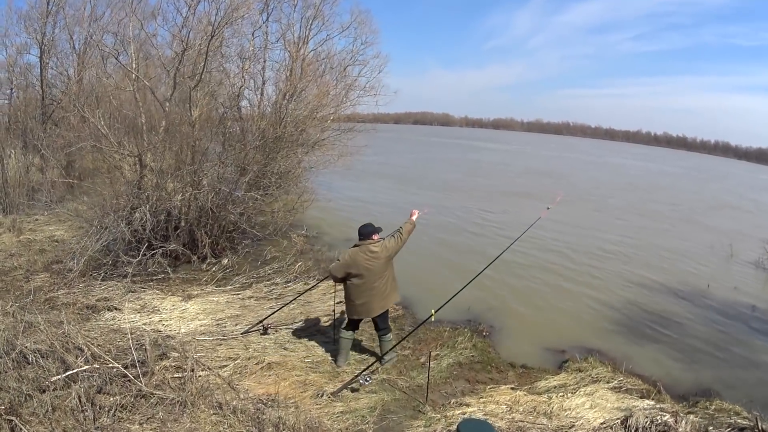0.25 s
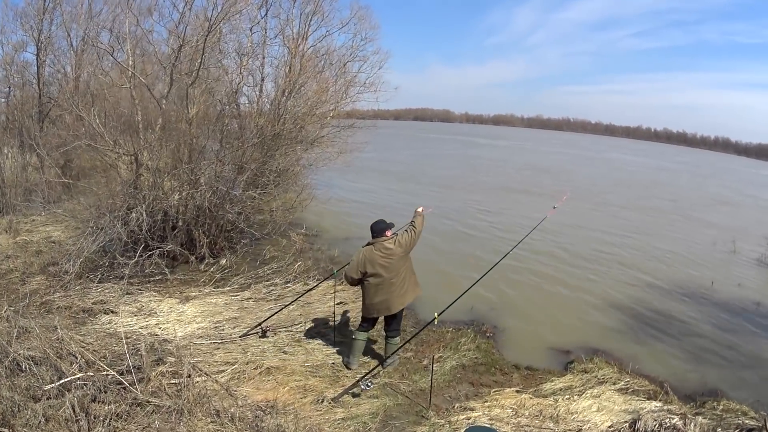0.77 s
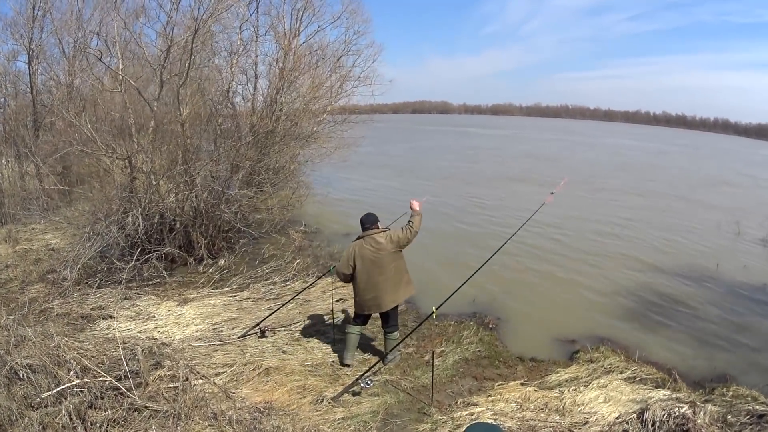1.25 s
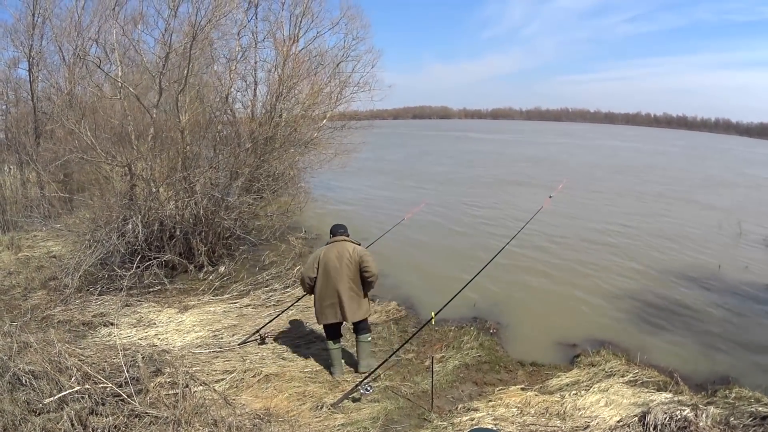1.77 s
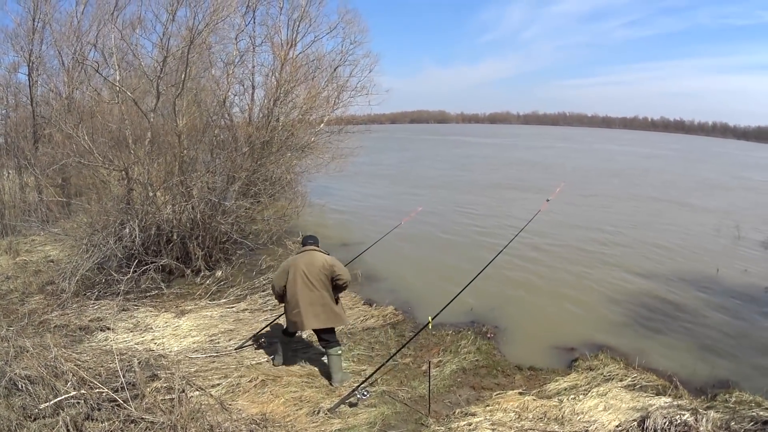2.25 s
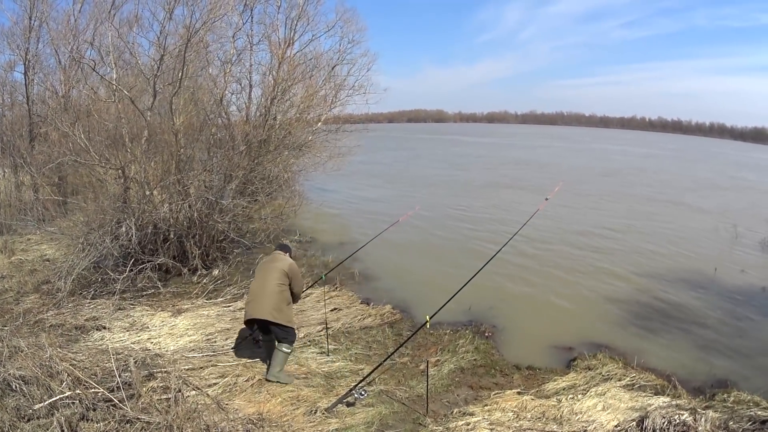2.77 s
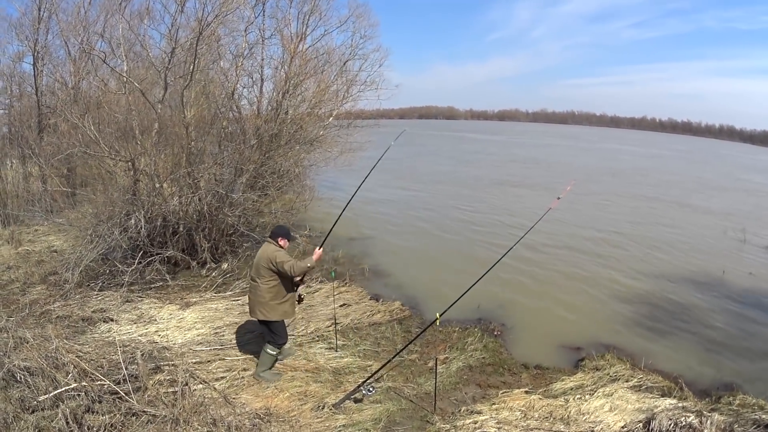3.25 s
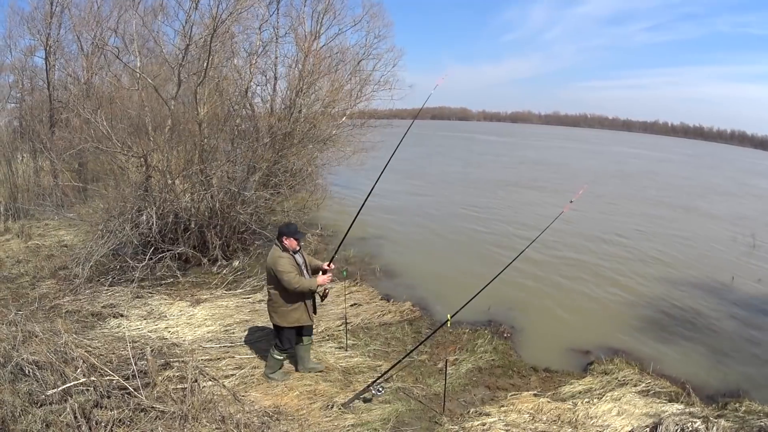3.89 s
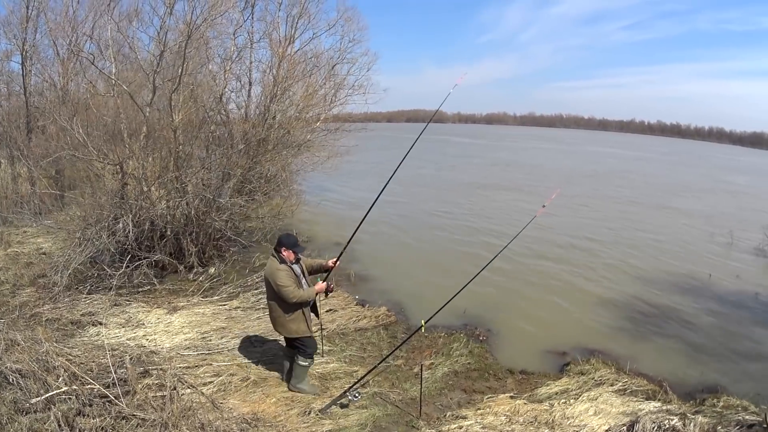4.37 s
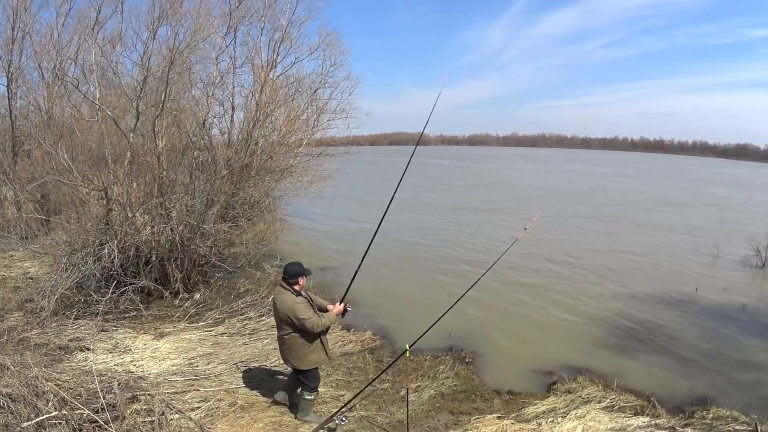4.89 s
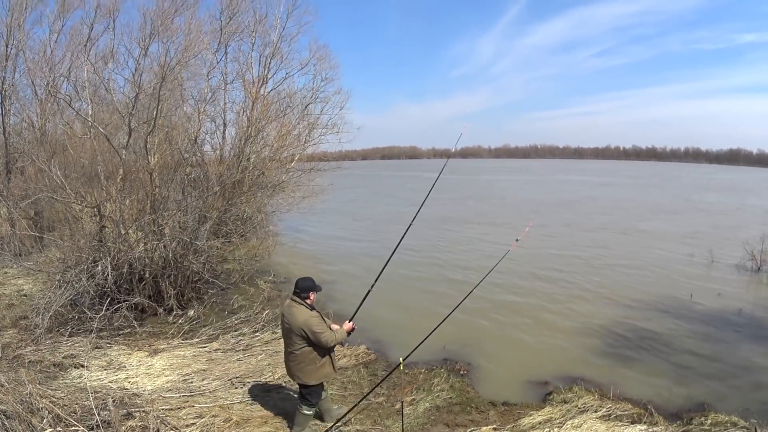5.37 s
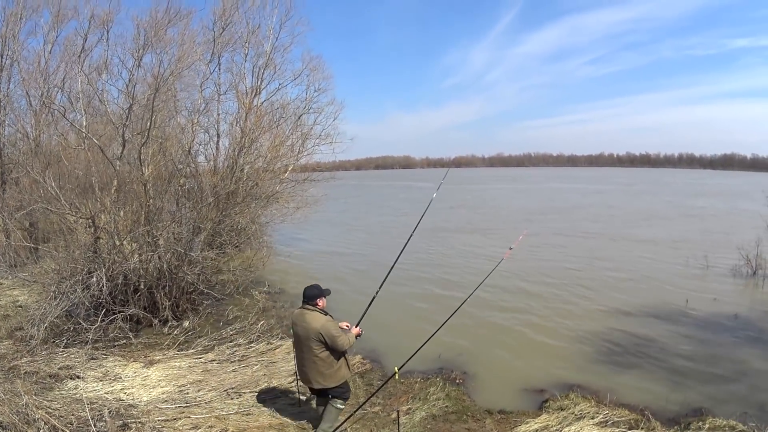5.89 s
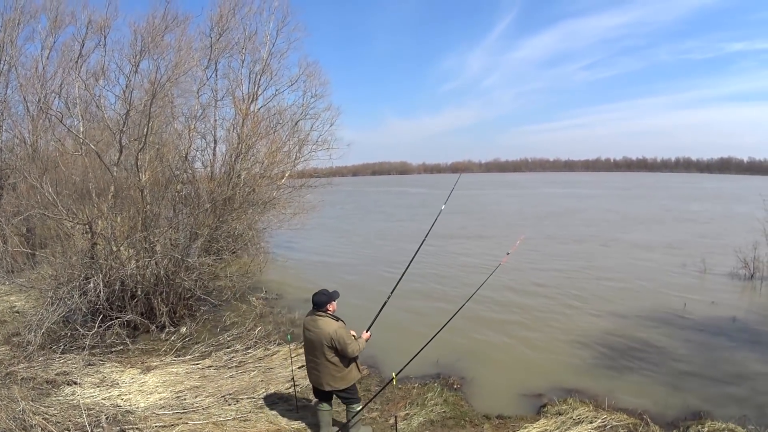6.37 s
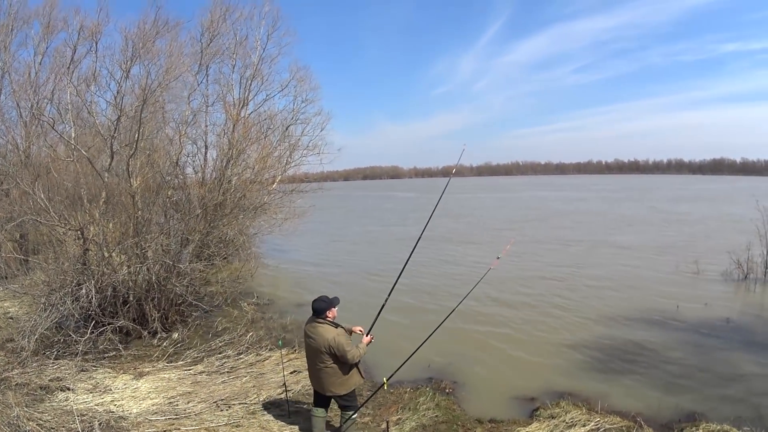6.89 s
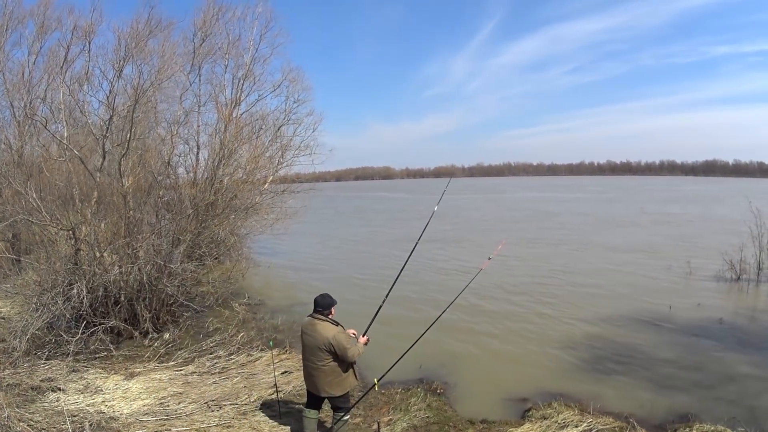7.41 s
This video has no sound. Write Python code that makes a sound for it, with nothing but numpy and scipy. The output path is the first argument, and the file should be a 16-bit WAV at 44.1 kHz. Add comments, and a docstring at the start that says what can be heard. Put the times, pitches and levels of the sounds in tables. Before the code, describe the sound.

Close, dry outdoor stereo sound by water, with very light wind. First a sleeve brushes softly and a tiny rod bell rattles irregularly above gentle grass crunches. Heavier footsteps follow, with straw crackling loudly, boots knocking on earth and twigs cracking. The bell almost stops as the rod is lifted. Finally reel gears whine up and down with each turn of the handle, with a scratchy rub of spool and line, in two spells.

```python
"""On a riverbank an angler treads through dry grass: stalks crunch, twigs snap, boots thud on the earth.
A small bite bell jingles on the rod as he picks it up; then he winds the reel, whose gears whirr in surges.
A hand and a sleeve brush softly close by, and light wind lies underneath.
Grass, earth and rubbing parts are coloured noise or tiny clicks; bell and gears are sums of sine waves."""
import sys
import numpy as np
from scipy import signal
from scipy.fft import rfft, irfft, next_fast_len
from scipy.io import wavfile
from scipy.ndimage import map_coordinates

SR = 44100
rng = np.random.default_rng(int(sys.argv[2]) if len(sys.argv) > 2 else 0)


def inscribe(sig):
    """Save sig as 16-bit PCM at rate SR to the path in sys.argv[1].

    A 1-D sig is mono; a 2-D sig holds one channel per row.
    Samples are clipped to [-1, 1] before scaling.
    """
    pcm = np.round(np.clip(np.atleast_2d(sig).T, -1, 1) * 32767)
    wavfile.write(sys.argv[1], SR, pcm.astype(np.int16))


N = 337365  # length in samples

# Levels in the tables are relative: trims, fades and the left-right balance act on them later.


def amp(db):
    """Decibels to gain."""
    return 10 ** (np.asarray(db) / 20)


def unit(x):
    """x at rms 1."""
    return x / np.sqrt(np.mean(x ** 2) + 1e-20)


def along(points, hz):
    """(Hz, value) points read on a log frequency axis."""
    f, v = np.transpose(points)
    return np.interp(np.log(hz + 1), np.log(f + 1), v)


def curves(rows):
    """One value per sample for each column after the time."""
    s, *cols = np.transpose(rows)
    return [np.interp(np.arange(N) / SR, s, c) for c in cols]


def wobble(rate):
    """A smooth random curve with the given number of knots a second."""
    knots = rng.standard_normal(int(N * rate / SR) + 4)
    return map_coordinates(knots, [np.arange(N) * rate / SR])


def filtered(x, response):
    """x times a complex response of frequency."""
    m = next_fast_len(x.shape[-1] + SR // 4)
    return irfft(rfft(x, m) * response(np.fft.rfftfreq(m, 1 / SR)), m)[..., :x.shape[-1]]


def coloured(x, spectrum):
    """x shaped by a (Hz, dB) spectrum, at rms 1."""
    return unit(filtered(x, lambda hz: amp(along(spectrum, hz))))


def ringing(peaks):
    """The frequency response of (Hz, width Hz, dB) resonances."""
    return lambda f: sum(amp(db) * 1j * f * w / (c * c - f * f + 1j * f * w) for c, w, db in peaks)


def resonant(x, peaks):
    """x through resonances, at rms 1."""
    return unit(filtered(x, ringing(peaks)))


def grains(rate, spread_db):
    """Two unrelated trains of tiny clicks of uneven size, at a rate per second."""
    hit = rng.random((2, N)) < rate / SR
    size = amp(spread_db * np.minimum(rng.exponential(size=(2, N)), 4))
    return unit(hit * size * rng.choice([-1, 1], (2, N)))


def spread(pair, alike):
    """Two unrelated signals, used as middle and side, become left and right of a given likeness."""
    turn = lambda hz: np.arccos(np.clip(along(alike, hz), -1, 1)) / 2
    mid, side = filtered(pair, lambda hz: np.array([np.cos(turn(hz)), np.sin(turn(hz))]))
    return np.array([mid + side, mid - side])


def add(track, s, db, sound):
    """Put a sound into a track at a time and a peak level."""
    part = track[:, max(round(s * SR), 0):][:, :sound.shape[-1]]
    part += amp(db) * (sound / np.abs(sound).max(axis=-1, keepdims=True))[:, :part.shape[-1]]


RISE_DB = 31  # how far a stroke climbs during its rise time


def stroke(s, rise, hold, release):
    """The dB envelope of one stroke: it swells up to s, holds and dies away."""
    t = np.arange(N) / SR - s
    swell = RISE_DB * np.minimum(t, 0) / max(rise, .005)
    fade = release * np.maximum(t - hold, 0)
    return np.maximum(swell - fade, -150)


SETTLE_DB_PER_S = 49


def strokes(rows, release, settle_db=-100):
    """The joint gain of (s, rise, hold, dB) strokes, each with a slower tail at settle_db below it."""
    power = np.zeros(N)
    for s, rise, hold, db in rows:
        tail = settle_db + stroke(s, rise, hold, SETTLE_DB_PER_S)
        level = np.maximum(stroke(s, rise, hold, release), tail)
        power += np.exp((db + level) * np.log(10) / 10)
    return np.sqrt(power)


# boots sweeping through and crushing the stalks:
# (time of full weight [s], rise [s], hold [s], crackle level [dB], crunch level [dB])
GRASS_STEPS = [(0.01, 0.085, 0.016, -47, -50), (0.196, 0.061, 0.032, -47.5, -53.5),
               (0.626, 0.29, 0.013, -48, -49), (0.773, 0.032, 0.05, -49, -50.5),
               (1.354, 0.033, 0.0075, -59, -43), (1.544, 0.48, 0.018, -51, -53),
               (1.637, 0.11, 0.013, -54, -46.5), (1.806, 0.21, 0.032, -51, -51),
               (1.955, 0.027, 0.057, -48.5, -43.5), (2.127, 0.078, 0.25, -32, -48),
               (2.609, 0.29, 0.31, -41, -45.5), (2.996, 0.37, 0.11, -45, -79),
               (3.243, 0.14, 0.018, -42, -48), (3.347, 0.075, 0.031, -45.5, -50.5),
               (3.781, 0.21, 0.021, -33, -45), (4.004, 0.31, 0.041, -42.5, -50),
               (4.297, 0.22, .02, -38, -52), (4.525, 0.19, 0.012, -37.5, -45.5),
               (5.32, 0.23, 0.056, -46.5, -75), (5.94, 0.74, 0.29, -41.5, -50.5)]
# straw stirring underfoot between the steps: (time [s], crackle level [dB])
STRAW_STIR = [(0, -52.5), (1.1, -57.5), (1.9, -56.5), (3.5, -51.5), (4.6, -57), (4.9, -55), (5.7, -65),
              (6.3, -56.5), (6.5, -66)]
# tone of the fine crackle: (frequency [Hz], level [dB])
STALK_TONE = [(1500, -18), (3000, -12), (4500, -6), (6000, -1.5), (7200, -0.5), (8300, 3), (10000, 3),
              (11200, -5.5)]
# tone of the coarser crunch: (frequency [Hz], level [dB])
CRUNCH_TONE = [(300, -3.5), (700, 1.5), (1200, 1.5), (2000, -1.5), (3200, -3), (5000, 3), (8000, -1.5)]
# tone of stiffer stems that crack singly: (frequency [Hz], level [dB])
STIFF_STEM_TONE = [(400, -32), (1000, 3), (2200, 5), (4000, -9), (9000, -5)]
STEMS_PER_S, STEMS_DB = 86, -17.5
STIR_CRUNCH_DB = -5  # crunch of the stirring straw against its crackle
# how fast a step lets go, and the level at which the stalks spring back after it
RELEASE_DB_PER_S, SETTLE_DB = 160, -17


def grass():
    """Many stalks break in clumps under each step: a fine bright crackle over a coarser crunch."""
    stir_db, = curves(STRAW_STIR)
    crackle_rows = [(s, rise, hold, db) for s, rise, hold, db, _ in GRASS_STEPS]
    crunch_rows = [(s, rise, hold, db) for s, rise, hold, _, db in GRASS_STEPS]
    bright = np.hypot(amp(stir_db), strokes(crackle_rows, RELEASE_DB_PER_S, SETTLE_DB))
    coarse = np.hypot(amp(stir_db + STIR_CRUNCH_DB), strokes(crunch_rows, RELEASE_DB_PER_S, SETTLE_DB))
    rate = 5000 * np.sqrt(bright / amp(-48))  # more weight breaks more stalks
    fractures = grains(rate, spread_db=2.0) / np.sqrt(rate)
    clumps = amp(1.4 * wobble(110) + .8 * wobble(25))
    crackle = amp(2.1) * bright * coloured(fractures * clumps, STALK_TONE)
    crunch = amp(2.0) * coarse * coloured(grains(1100, spread_db=1.5) * clumps, CRUNCH_TONE)
    cracks = coloured(grains(STEMS_PER_S, spread_db=4.5), STIFF_STEM_TONE)
    stems = amp(STEMS_DB) * np.sqrt(bright * coarse) * cracks
    return crackle + crunch + stems


# soles scuffing the earth: (time of full weight [s], rise [s], hold [s], level [dB])
SOLE_SCUFFS = [(2.62, 0.065, 0.008, -50.5), (2.76, 0.09, 0.019, -49.5), (4.52, 0.02, 0.012, -52.5)]
# tone of the scuffed earth: (frequency [Hz], level [dB])
EARTH_TONE = [(40, -60), (110, -13), (220, -39), (350, 8), (600, 6), (1050, -7), (1600, -23), (3500, -90)]
# dull knocks of boots on earth and sticks: (time [s], level [dB], pitch [Hz])
BOOT_THUDS = [(0.871, -40.5, 645), (0.988, -39.5, 990), (1.962, -26, 660), (1.963, -44.5, 170),
              (2.003, -34.5, 666), (2.106, -46, 160), (2.173, -31.5, 590), (2.183, -27, 1160),
              (2.432, -32.5, 617), (2.855, -32.5, 2000), (2.954, -35, 520), (3.784, -38.5, 506),
              (3.794, -36, 1900), (4.118, -39.5, 1040), (4.134, -39, 980), (4.162, -43, 1150),
              (4.206, -43, 1470), (4.523, -41.5, 615), (4.536, -43, 210), (5.03, -46, 396),
              (5.205, -39.5, 1180)]


def boots():
    """Soles scuff the ground as gritty noise, and each footfall gives a damped knock."""
    scuff_gain = strokes(SOLE_SCUFFS, RELEASE_DB_PER_S)
    out = scuff_gain * coloured(grains(1800, spread_db=5.5), EARTH_TONE)
    t = np.arange(SR // 6) / SR
    # a short push and a fainter, longer one
    shape = (1 - np.exp(-t / .002)) * (amp(-60 * t / .035) + amp(-20 - 60 * t / .18))
    for s, db, hz in BOOT_THUDS:
        push = rng.standard_normal((2, len(t))) * shape
        knock = resonant(push, [(hz, 0.39 * hz, 0), (200, 120, -15)])
        dulled = filtered(knock, lambda f: 1 / (1 + 1j * f / (3 * hz)))
        add(out, s, db + 0.5, dulled)
    return out


# twigs snapping: (time [s], level [dB], pitch [Hz])
TWIG_SNAPS = [(0.0458, -25.5, 9350), (0.086, -35, 8100), (0.7428, -29.5, 8900), (0.747, -30.5, 8900),
              (0.8763, -36.5, 4530), (1.152, -37, 7040), (2.8545, -22, 8900), (3.467, -29, 8400),
              (3.473, -39, 9500), (4.1344, -28, 9200), (4.1629, -32, 9100), (4.2075, -33, 2410),
              (4.6762, -36.5, 9300), (4.908, -43, 3000), (5.2075, -38, 6150), (5.435, -24.5, 6060),
              (6.8318, -37, 9400)]
TOP_HZ = 11150  # upper limit of the twigs and of the whole scene


def twigs():
    """A twig breaks in one sharp crack; splinters and the ground scatter a faint tail."""
    out, t = np.zeros((2, N)), np.arange(SR // 12) / SR
    for s, db, hz in TWIG_SNAPS:
        crack = rng.standard_normal((2, len(t))) * (amp(-60 * t / .004) + amp(-28 - 60 * t / .05))
        crack[0, 0] = 5  # the break itself, a single click in the middle
        wood = resonant(crack, [(hz, .18 * hz, 0), (5500, 5000, -9)])
        add(out, s + .0005, db + 10.5, filtered(wood, lambda f: f < TOP_HZ))
    return out


# strikes of the bell's pellet: (time [s], level [dB], strongest pitch [Hz], rattling time [s])
BELL_SHAKES = [(0.451, -42, 4360, 0.027), (0.51, -37, 4470, 0.0054), (.533, -31.5, 4360, 0.033),
               (0.559, -33, 4500, 0.0079), (.611, -31, 4100, 0.042), (0.643, -31, 4470, .008),
               (.693, -29, 4700, 0.0074), (0.706, -26.5, 4330, 0.0069), (0.725, -32.5, 4470, .008),
               (0.744, -24, 4100, 0.018), (0.821, -24.5, 4690, .005), (0.832, -32, 4450, 0.023),
               (0.864, -30, 4040, 0.019), (0.953, -37, 4450, .004), (0.987, -33.5, 4320, .004),
               (1.021, -32.5, 4470, .004), (1.089, -36, 4160, 0.0076), (1.139, -39, 4350, 0.0094),
               (1.231, -31.5, 4305, .005), (1.259, -31.5, 4060, 0.019), (1.296, -30.5, 4060, 0.023),
               (1.32, -31, 4130, 0.018), (1.347, -35.5, 4440, .006), (1.433, -27.5, 4830, 0.0055),
               (1.551, -30, 4000, 0.0044), (1.74, -32, 4680, .006), (1.808, -32.5, 4030, .003),
               (1.839, -27, 4290, .005), (1.988, -27.5, 4180, 0.0084), (2.035, -33.5, 4460, 0.022),
               (2.086, -24.5, 4336, 0.004), (2.194, -23, 4000, 0.0085), (2.442, -36.5, 4670, 0.026),
               (2.498, -33, 4630, 0.013), (2.604, -25.5, 4180, 0.0096), (4.107, -43, 4360, 0.0073)]
# the tones of the bell's shell: (frequency [Hz], level [dB], time to fade by 60 dB [s])
BELL_MODES = [(3950, -13.5, 0.072), (4100, -12, 0.097), (4250, 0.5, 0.034), (4490, -5, 0.12),
              (4757, -0.5, 0.015), (4970, -0.5, 0.016), (5280, 0.5, 0.011), (8180, -12, 0.044),
              (9060, -15, 0.052)]
FAVOUR_DB, FAVOUR_HZ = 13, 135  # how strongly and how widely the struck spot favours its modes
CONTACTS_PER_S = 480


def bell():
    """With each shake the pellet hits the shell, then rattles on ever more lightly."""
    out, t = np.zeros((2, N)), np.arange(SR // 5) / SR
    for s, db, pitch_hz, rattle in BELL_SHAKES:
        touching = rng.random(len(t)) < CONTACTS_PER_S / SR
        contacts = touching * rng.standard_normal(len(t)) * np.exp(-(t / rattle) ** 2)
        contacts[0] = 1.1  # the first hit
        # the pellet rolls on and keeps the shell faintly ringing
        contacts += .022 * rng.standard_normal(len(t)) * np.exp(-t / .04)
        swing = t * (1 + .004 * rng.standard_normal())  # each shake is slightly off in pitch
        shell = 0
        for hz, level, t60 in BELL_MODES:
            # the struck spot favours the modes near one pitch and its octave
            distance_hz = min(abs(hz - pitch_hz), abs(hz / 2 - pitch_hz))
            favour_db = FAVOUR_DB * np.exp(-(distance_hz / FAVOUR_HZ) ** 2)
            # each mode radiates its own way: random phases in the two channels
            tone = np.sin(2 * np.pi * (hz * swing + rng.random((2, 1))))
            shell = shell + amp(level + favour_db - 60 * t / t60) * tone
        shell *= 1 - np.exp(-t / .001)
        add(out, s + .001, db, signal.fftconvolve(shell, contacts[None], axes=1)[:, :len(t)])
    return out


# surges of the gears, in two spells of winding: (time of crest [s], tooth rate [Hz], whine level [dB])
GEAR_SURGES = [(4.9, 1000, -78), (5.015, 1320, -59), (5.08, 1550, -61), (5.14, 1310, -56),
               (5.237, 1480, -61), (5.297, 1570, -60), (5.372, 1190, -47), (5.42, 1180, -54),
               (5.555, 2090, -62), (5.608, 2870, -52), (5.666, 3350, -49), (5.729, 2750, -49),
               (5.818, 2600, -49), (5.895, 2800, -54), (5.98, 2700, -46), (6.045, 2650, -43),
               (6.117, 2600, -44), (6.207, 2110, -42), (6.298, 2020, -45), (6.39, 1300, -72),
               (6.7, 800, -80), (6.8, 1025, -65), (6.98, 1435, -56), (7.108, 1525, -58), (7.228, 1990, -53),
               (7.322, 2240, -48), (7.418, 2390, -46), (7.495, 2950, -43), (7.562, 2825, -47),
               (7.645, 2100, -46)]
# multiples of the tooth rate; alternate teeth mesh unevenly, which gives the half order:
# (multiple [x tooth rate], level [dB])
GEAR_MESH = [(1, -2), (1.5, -18.5), (2, -0.5), (3, -12)]
# the lowest partial weakens as the winding goes on: (time [s], level [dB])
LOWEST_PARTIAL = [(5.85, 0), (6.3, -7)]
# how well the housing radiates the whine: (frequency [Hz], level [dB])
HOUSING_TONE = [(900, -22), (1600, 0), (5500, 0), (10000, 8)]
# resonances that flare up as the whine sweeps over them: (frequency [Hz], width [Hz], level [dB])
WHINE_FLARES = [(2330, 140, 8), (4170, 160, -1)]
# the rubbing parts: (time [s], body level [dB], spool level [dB], line roller level [dB])
RUBBING_LEVELS = [(4.92, -61, -85, -80), (4.98, -55, -56.5, -67), (5.22, -58.5, -62.5, -62),
                  (5.38, -56.5, -60, -55), (5.62, -52.5, -55, -46.5), (5.87, -52, -57, -51),
                  (6.2, -51, -48.5, -61), (6.42, -58, -57.5, -71), (6.47, -90, -80, -83),
                  (6.68, -74, -65.5, -72), (6.78, -58, -60, -58.5), (7.2, -53.5, -54.5, -53.5),
                  (7.65, -51, -46, -55)]
# resonances of body, spool and line roller, each: (frequency [Hz], width [Hz], level [dB])
BODY_PEAKS = [(1250, 200, -3), (1650, 180, 1), (2310, 120, 6), (2600, 150, 0), (2960, 200, -4),
              (2040, 900, -3)]
SPOOL_PEAKS = [(4190, 50, 7.5), (4730, 150, -0.5), (5300, 210, 1), (5590, 190, -5), (6200, 210, -6)]
ROLLER_PEAKS = [(7830, 130, 4), (7900, 67, -3.5), (8260, 110, 2.5), (8880, 120, -6.5), (9300, 130, -7)]
# left-right likeness of the angler's sounds: (frequency [Hz], likeness [0 to 1])
ANGLER_ALIKE = [(150, 0.92), (1300, 0.35), (2500, 0.61), (5000, 0.94), (10000, 0.97)]
SAG_SHARE = .35  # share of their speed that the gears lose midway between two surges
WHINE_SAG_DB, RUB_SAG_DB = 5.5, 5  # how far whine and rubbing fade there


def reel():
    """Gears surge and sag, so their whine moves in arches; body, spool and line roller rub along."""
    crest_hz, whine_db = curves(GEAR_SURGES)
    turn, = curves([(row[0], k) for k, row in enumerate(GEAR_SURGES)])
    sag = np.abs(np.sin(np.pi * turn)) ** 3  # 0 at a crest, 1 midway between two
    tooth_hz = crest_hz * (1 - SAG_SHARE * sag) * (1 + .024 * wobble(400))
    phase = 2 * np.pi * np.cumsum(tooth_hz) / SR
    lowest_db, = curves(LOWEST_PARTIAL)
    teeth = 0
    for k, db in GEAR_MESH:
        level_db = db + lowest_db * (k == 1) + 3.5 * wobble(300) + 3 * wobble(70)
        teeth = teeth + amp(level_db) * np.sin(k * phase + .55 * wobble(1100))
    surging = teeth * amp(whine_db - WHINE_SAG_DB * sag)
    whine = filtered(surging, lambda hz: amp(along(HOUSING_TONE, hz)) + ringing(WHINE_FLARES)(hz))

    body_db, spool_db, roller_db = curves(RUBBING_LEVELS)
    drag_db = lambda: 2 * wobble(40) - RUB_SAG_DB * sag
    body = amp(body_db + 1.5 + drag_db()) * resonant(grains(6500, spread_db=3.5), BODY_PEAKS)
    spool = amp(spool_db + 1.5 + drag_db()) * resonant(grains(6000, spread_db=1.5), SPOOL_PEAKS)
    roller = 0
    for hz, width, db in ROLLER_PEAKS:  # each resonance flutters on its own
        rub = resonant(grains(4000, spread_db=-0.5), [(hz, width, 0)])
        roller = roller + amp(roller_db + db - 5 + drag_db()) * rub
    rubbing = spread(body + spool + roller, ANGLER_ALIKE)
    return (turn > 0) * (whine + rubbing)  # silent until the handle turns


# soft hollow rubs of a hand: (time [s], level [dB], pitch [Hz])
HAND_RUBS = [(1.084, -44.5, 870), (1.264, -42.5, 960), (1.384, -41, 950)]


def hand():
    """A shifting grip rubs a hollow housing: soft bursts of noise through two resonances, twice."""
    out, t = np.zeros((2, N)), np.arange(SR // 5) / SR
    for s, db, hz in HAND_RUBS:
        rub = rng.standard_normal((2, len(t))) * (1 - np.exp(-t / 0.0059)) * amp(-60 * t / 0.25)
        housing = [(hz, 220, 0), (220, 260, -2.5)]
        add(out, s, db + 4.0, resonant(resonant(rub, housing), housing))
    return out


# soft brushes of a sleeve: (time of full weight [s], rise [s], hold [s], level [dB])
SLEEVE_BRUSHES = [(0.225, 0.15, 0.023, -39), (0.3, 0.057, .01, -46), (0.425, 0.17, 0.05, -49.5),
                  (1.36, 0.085, 0.016, -50.5)]
# the hollow that they sound: (frequency [Hz], width [Hz], level [dB])
HOLLOW_PEAKS = [(90, 93, -9), (361, 114, 1.5), (761, 56, -0.5), (1056, 45, -3), (1540, 50, -9),
                (2020, 77, -20)]
BRUSH_RELEASE_DB_PER_S = 383


def sleeve():
    """Cloth brushes by close at hand and sounds a small hollow: swelling noise through resonances."""
    cloth = resonant(rng.standard_normal((2, N)), HOLLOW_PEAKS)
    return strokes(SLEEVE_BRUSHES, BRUSH_RELEASE_DB_PER_S) * cloth


# the low rumble of the wind: (time [s], level [dB])
WIND_RUMBLE = [(0, -55), (1.1, -53.5), (1.3, -56), (1.55, -56), (3, -58), (7.65, -72)]
# tone of the rumble: (frequency [Hz], level [dB])
RUMBLE_TONE = [(20, -16), (50, 7), (100, 5), (180, -4), (400, 7), (1000, -7.5)]
# tone of the airy hiss: (frequency [Hz], level [dB])
AIR_TONE = [(25, -13.5), (100, -9.5), (200, -5), (400, -7.5), (1000, -9.5), (2500, -12.5), (11000, -25.5)]


def breeze():
    """Light wind over open water and bare willows: noise as an unsteady rumble and a steadier hiss."""
    rumble_db, = curves(WIND_RUMBLE)
    rumble_gain = amp(rumble_db + 0.5 + 3.3 * wobble(8.6))
    rumble = rumble_gain * coloured(rng.standard_normal((2, N)), RUMBLE_TONE)
    hiss = amp(-57.5 + .5 * wobble(3)) * coloured(rng.standard_normal((2, N)), AIR_TONE)
    return rumble + hiss


# where the angler stands: (time [s], left minus right level [dB])
ANGLER_PLACE = [(0, .6), (.7, -1.2), (1.3, -.5), (2.2, 2.7), (2.7, 1.5), (3.3, 2.2), (4.3, 1.2), (6.2, -.4)]
# left-right likeness of wind, hand and sleeve: (frequency [Hz], likeness [0 to 1])
OPEN_AIR_ALIKE = [(40, 0.66), (100, 1), (250, 0.057), (1300, 0.0093), (5000, 0.03)]


def scene():
    """The angler's sounds move with him; wind, hand and sleeve lie all around."""
    side_db, = curves(ANGLER_PLACE)
    angler = spread(grass() + boots() + twigs() + bell(), ANGLER_ALIKE) + reel()
    around = spread(breeze() + hand() + sleeve(), OPEN_AIR_ALIKE)
    return angler * amp([side_db / 2, -side_db / 2]) + around


def record(dry):
    """A very steep low-pass removes what lies above TOP_HZ."""
    return filtered(dry, lambda hz: 1 / np.sqrt(1 + (hz / TOP_HZ) ** 300))


dry = scene()
out = record(dry)
inscribe(out)
```